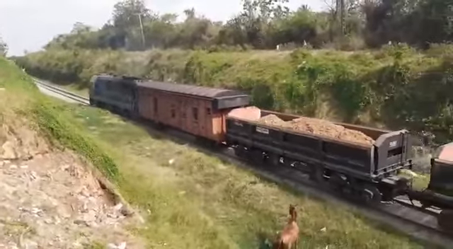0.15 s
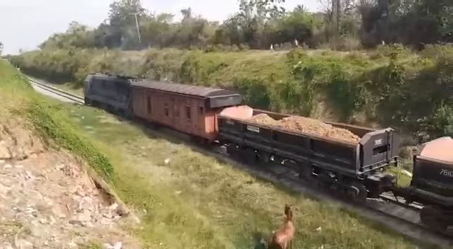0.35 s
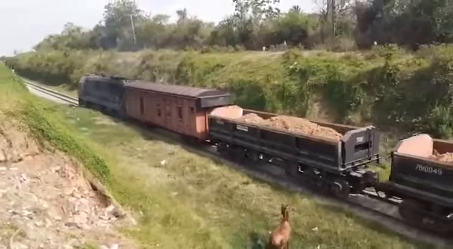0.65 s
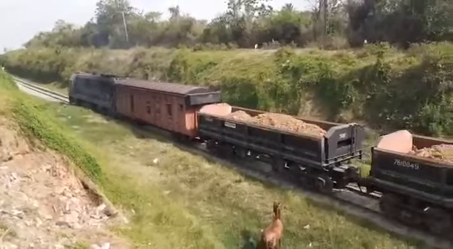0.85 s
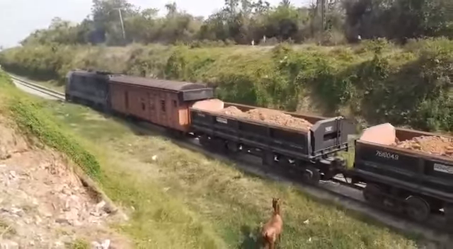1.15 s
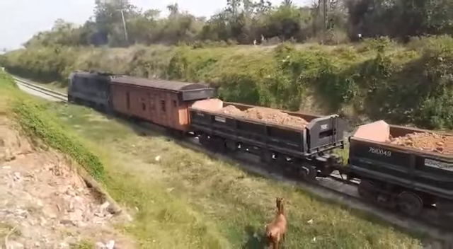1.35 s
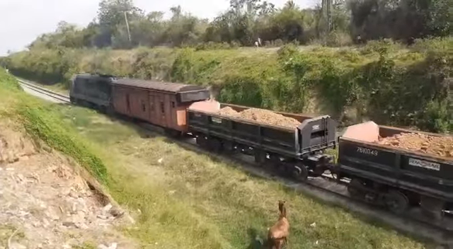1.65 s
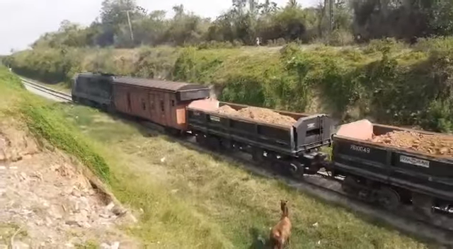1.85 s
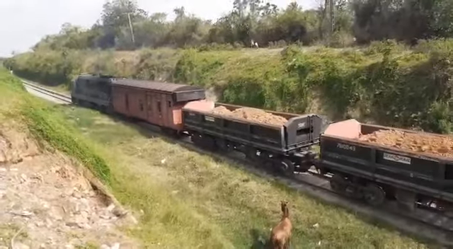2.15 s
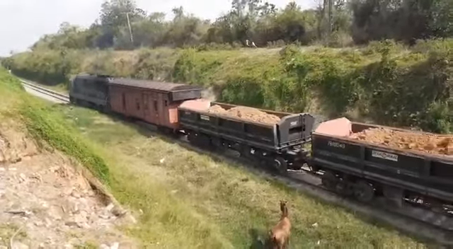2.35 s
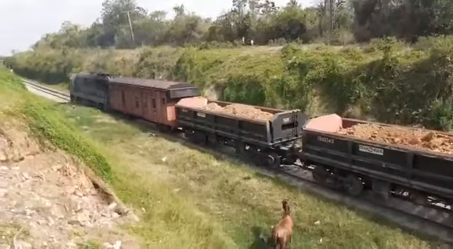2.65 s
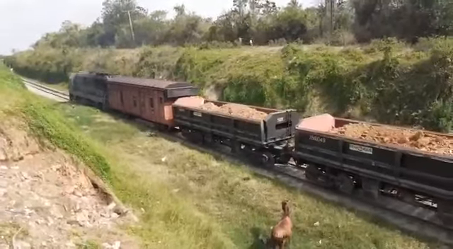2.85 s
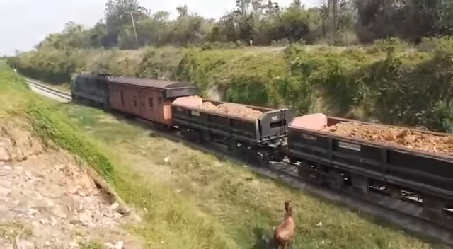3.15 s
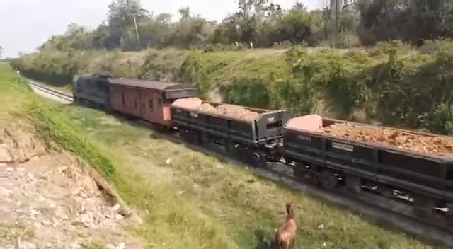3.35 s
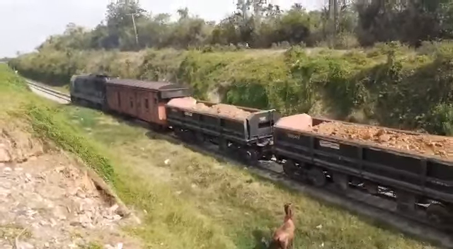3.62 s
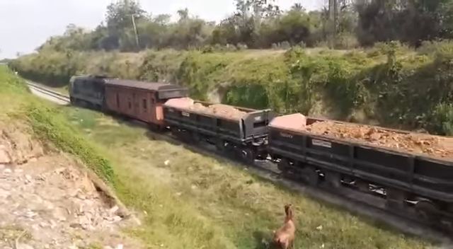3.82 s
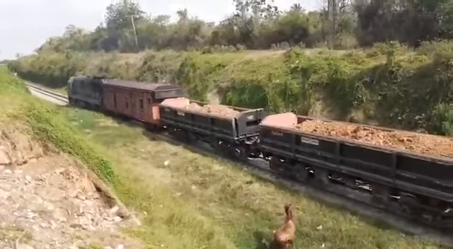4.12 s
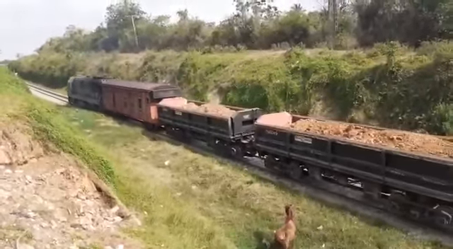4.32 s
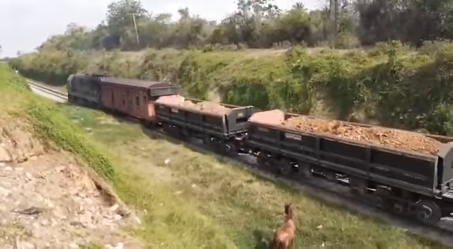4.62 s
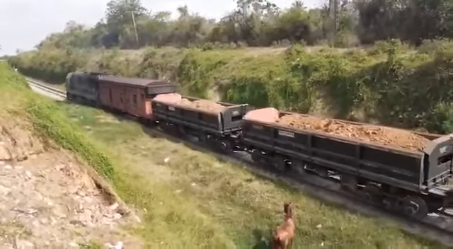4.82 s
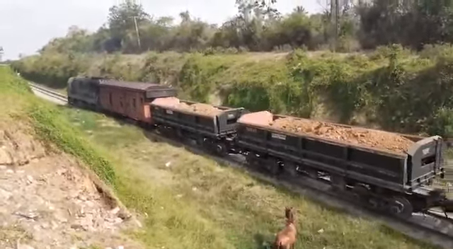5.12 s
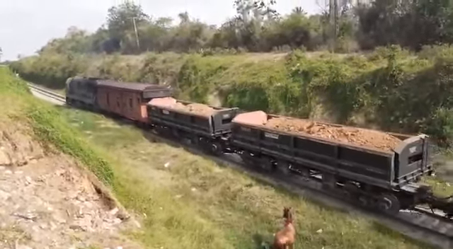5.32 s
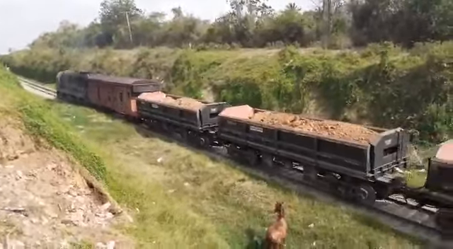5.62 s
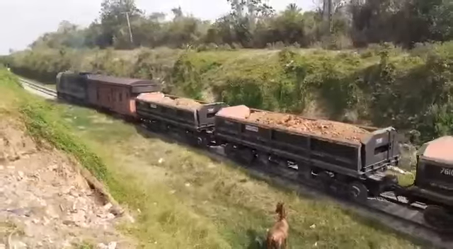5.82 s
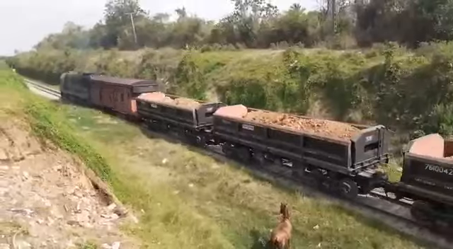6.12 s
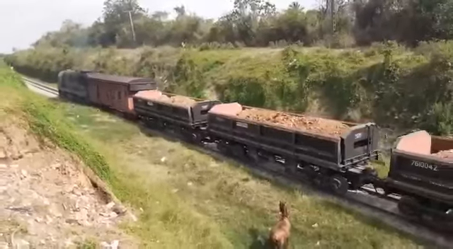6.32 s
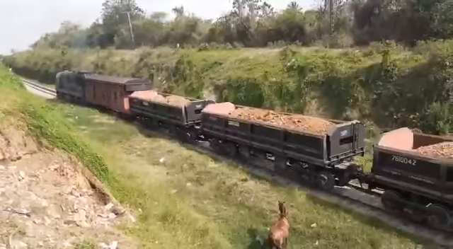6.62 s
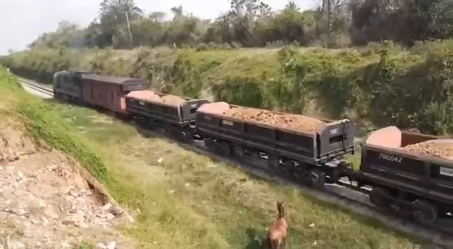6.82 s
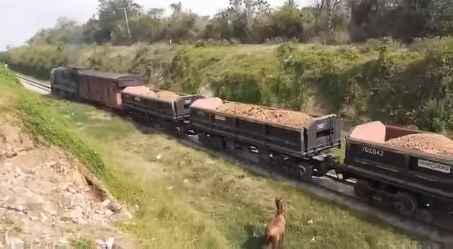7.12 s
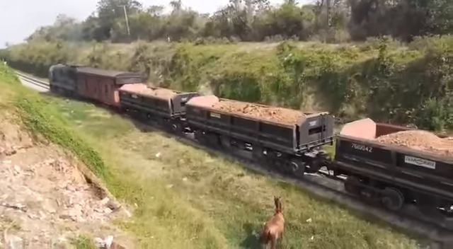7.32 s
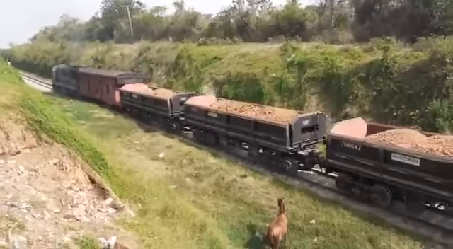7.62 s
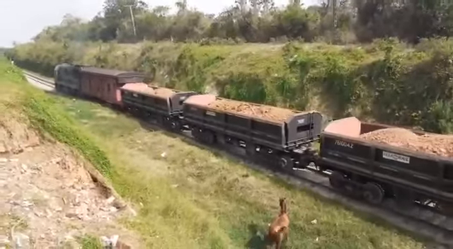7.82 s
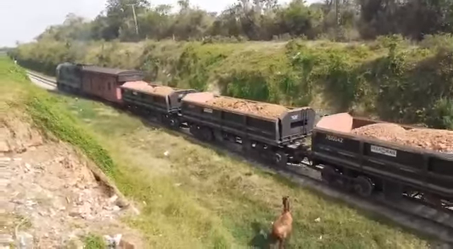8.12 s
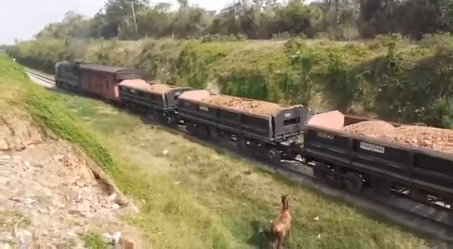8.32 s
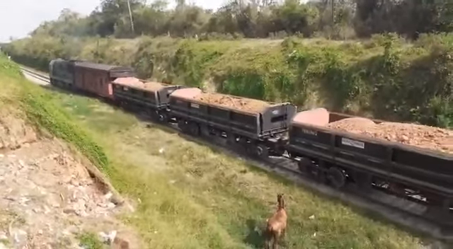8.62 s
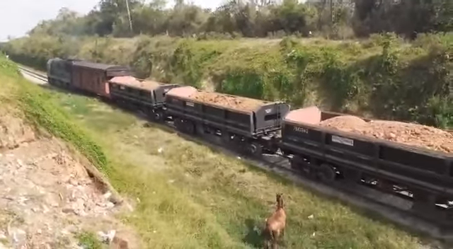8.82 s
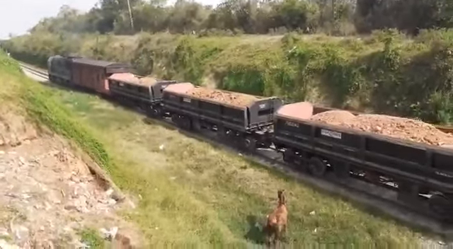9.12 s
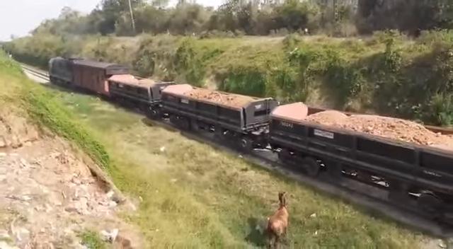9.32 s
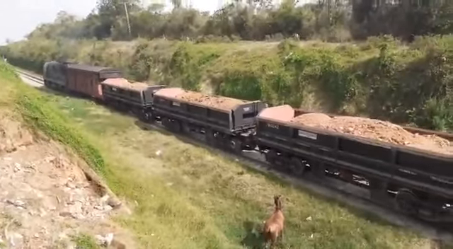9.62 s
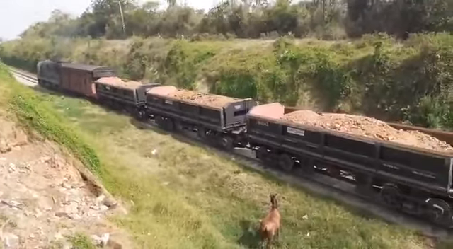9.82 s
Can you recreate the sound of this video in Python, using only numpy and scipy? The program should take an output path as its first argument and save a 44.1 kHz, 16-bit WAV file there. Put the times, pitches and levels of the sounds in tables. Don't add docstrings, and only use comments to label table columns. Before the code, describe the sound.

A diesel locomotive throbs hard with an uneven chugging beat, drawing loaded freight wagons away outdoors while wind thumps and crackles on the microphone.

```python
import sys
import numpy as np
from scipy import signal
from scipy.fft import rfft, irfft
from scipy.io import wavfile
from scipy.ndimage import uniform_filter1d

SR = 44100
rng = np.random.default_rng(int(sys.argv[2]) if len(sys.argv) > 2 else 0)


def transcribe(u):
    v = np.clip(np.atleast_2d(u).T, -1, 1)
    q = np.round(v * 32767).astype(np.int16)
    wavfile.write(sys.argv[1], SR, q)


def volts_from_db(level):
    exponent = np.asarray(level, float) / 20
    return 10 ** exponent


N = 439222
T = np.arange(N) / SR
LEAD_SAMPLES = 8


def evened(x):
    return x / np.sqrt(np.mean(x ** 2, -1, keepdims=True) + 1e-20)


def read(points, hz):
    f, value = np.transpose(points)
    return np.interp(np.log(hz + 1), np.log(f + 1), value)


def curves(rows, t=T):
    s, *columns = np.transpose(rows)
    return [np.interp(t, s, c) for c in columns]


def wander(hz):
    z = rfft(rng.standard_normal(N))
    bin_hz = np.arange(len(z)) * SR / N
    return evened(irfft(z / (1 + (bin_hz / hz) ** 4), N))


def swells(calm_db, middle_s, length_s, level_db):
    power = volts_from_db(calm_db) ** 2 + 0 * T
    for s, span, level in zip(middle_s, length_s, volts_from_db(level_db)):
        at = slice(max(round((s - 4 * span) * SR), 0), round((s + 4 * span) * SR))
        power[at] += level ** 2 * np.exp(-2 * ((T[at] - s) / span) ** 2)
    return np.sqrt(power)


def resonate(x, hz, width_hz):
    turn = np.exp(2j * np.pi * np.cumsum(hz * np.ones(len(x))) / SR)
    r = np.exp(-np.pi * width_hz / SR)
    return 2 * (turn * signal.lfilter([1 - r], [1, -r], x / turn)).real


def band(x, lo_hz, hi_hz, order):
    return signal.sosfilt(signal.butter(order, [lo_hz, hi_hz], "band", fs=SR, output="sos"), x)


# pitch_hz, likeness [0-1]
LIKENESS = [(60, .5), (300, .8), (800, .65), (2000, .4), (3200, .45), (5000, .35), (11000, .35)]


def noise_pair(colour_db, patchy_db, size):
    frames, hz = 4 * N // size + 5, np.fft.rfftfreq(size, 1 / SR)
    a, b, c, d, patches = rng.standard_normal((frames, len(hz), 5)).T
    patches = uniform_filter1d(uniform_filter1d(patches, size=12, axis=0), size=14, axis=1)
    same = np.clip(read(LIKENESS, hz), 0, 1)[:, None]
    late = np.exp(-2j * np.pi * hz * LEAD_SAMPLES / SR)[:, None]
    left = a + 1j * b
    right = same * late * left + np.sqrt(1 - same ** 2) * (c + 1j * d)
    z = np.array([left, right]) * volts_from_db(colour_db(hz)[..., None] + patchy_db * patches / patches.std())
    return evened(signal.istft(z, nperseg=size, noverlap=3 * size // 4)[1][:, :N])


# time_s, rate_hz [cycles/s]
SPEED = [(0, 6.417), (2.5, 6.417), (4, 6.438), (5, 6.455), (7, 6.46), (8, 6.445), (10, 6.441)]


def engine_turns():
    return np.cumsum(curves(SPEED)[0]) / SR


def beats(pattern, hz, width_hz, uneven_db, slip_s):
    t = np.arange(4000) / SR
    place, db = np.transpose(pattern)
    luck = rng.standard_normal((65, len(place), 2))
    at_s = np.interp(np.arange(65)[:, None] + place, engine_turns(), T) + slip_s * luck[..., 0]
    kicks = np.zeros(N + 1)
    np.add.at(kicks, np.clip(at_s * SR, 0, N).astype(int), volts_from_db(db + uneven_db * luck[..., 1]))
    ring = t * np.exp(-np.pi * width_hz * t) * np.sin(2 * np.pi * hz * t)
    return signal.oaconvolve(kicks, ring / abs(ring).max())[:N]


# place [0-1 of engine cycle], level_db
SILENCER_BEATS = [(0.0725, -21.2), (0.3662, -26.8), (0.4088, -27.3), (0.475, -21.1), (0.535, -28.9),
                  (0.635, -25.2), (0.7412, -21.0), (0.7887, -20.9), (0.9588, -30.4)]
# place [0-1 of engine cycle], level_db
STACK_BEATS = [(0.0488, -22.4), (0.0962, -16.2), (0.1588, -20.8), (0.185, -17.0), (0.2112, -22.4),
               (0.3275, -26.8), (0.4262, -20.8), (0.6525, -17.9), (0.7812, -20.5), (0.84, -26.9)]


def exhaust_beats():
    silencer = evened(beats(SILENCER_BEATS, hz=140, width_hz=80, uneven_db=1.5, slip_s=.0002))
    stack = evened(beats(STACK_BEATS, hz=310, width_hz=80, uneven_db=2.5, slip_s=.00018))
    return volts_from_db(-3.0 + 1.0 * wander(1.9)) * stack + volts_from_db(-8.5 + 1.9 * wander(3.5)) * silencer


# pitch_hz, level_db
RUMBLE = [(25, -74), (60, -4.5), (115, -2.5), (200, -4.5), (300, 3), (380, -9), (480, -16), (600, -46)]


def engine_low(exhaust, exhaust_db, boost_db):
    rumble = noise_pair(lambda hz: read(RUMBLE, hz), patchy_db=1.0, size=4096)
    drone = np.sqrt(2) * np.sin(2 * np.pi * 18 * engine_turns())
    low = np.array([exhaust, np.roll(exhaust, LEAD_SAMPLES)]) + volts_from_db(-2.0) * rumble + volts_from_db(-12.0) * drone
    return low * volts_from_db(exhaust_db + np.outer([0, .68], boost_db))


# pitch_hz, level_db
ROAR_LEFT = [(600, -4), (760, 1.5), (1000, -10.5), (1250, -9.5), (2000, -10.5), (2800, -12.5), (3400, -24),
             (4800, -27), (6500, -32), (8600, -26.5), (9300, -30), (9900, -32), (11000, -29), (11700, -63)]
# pitch_hz, level_db
ROAR_RIGHT = [(600, -4), (760, 6), (1000, -2.5), (1250, -4.5), (2000, -3), (2800, -7), (3400, -17),
              (4800, -13.5), (6500, -14), (8600, -15.5), (9300, -21.5), (9900, -54), (11000, -31),
              (11700, -36)]


def roar_and_hiss(throb, exhaust_db, left_db, right_db, boost_db):
    rolling_share, engine_share = 0.61, 0.45
    roar_db = -36 + rolling_share * (left_db - left_db.mean()) + engine_share * (exhaust_db - exhaust_db.mean())

    def colour_db(hz):
        return np.array([read(ROAR_LEFT, hz), read(ROAR_RIGHT, hz)]) - 40 * (hz < 480)

    def split_db(hz):
        return np.clip(np.log(hz / 3300 + 1e-9) * 60, -90, 90)

    roar = noise_pair(lambda hz: colour_db(hz) - np.maximum(split_db(hz), 0), patchy_db=1.5, size=1024)
    roar = roar * volts_from_db(roar_db - 1.32 + np.outer([0, .55], boost_db) + 0.87 * (throb - 0.5) + 0.79 * wander(24))
    hiss = noise_pair(lambda hz: colour_db(hz) + np.minimum(split_db(hz), 0), patchy_db=1.27, size=1024)
    hiss = hiss * volts_from_db(np.array([left_db, right_db]) + 1.33 * (throb - 1) + 0.76 * wander(11.5))
    return roar + hiss


# middle_s, length_s, level_db
WHISTLE_SWELLS = [(0.287, 0.24, -37), (0.584, 0.075, -38), (1.95, 0.055, -47.5), (2.197, .05, -48),
                  (2.623, 0.068, -52), (3.035, 0.16, -45), (3.415, 0.026, -42), (3.68, .15, -50),
                  (4.526, 0.11, -45.5), (5.62, 0.093, -50.5), (6.68, .06, -47), (8.63, 0.02, -44.5),
                  (9.64, .05, -57), (9.96, .1, -58)]


def turbine_whistle(port_db):
    distant_db = -48 - 0.96 * T + 1.0 * (port_db - port_db[0])
    whine = resonate(rng.standard_normal(N), 5735 + 11 * wander(4), 28)
    whine = whine / (uniform_filter1d(abs(whine), size=500) + 1e-9) ** .7
    return evened(whine) * swells(distant_db, *np.transpose(WHISTLE_SWELLS)) * volts_from_db(2 * wander(20))


# middle_s, level_db, length_s, pitch_hz
CHIRPS = [(.9, -49, .04, 4950), (1.09, -42, .04, 4960), (1.16, -39, .02, 4960), (1.27, -48, .04, 4950),
          (1.88, -45, .02, 5000), (2.25, -47, .1, 4900), (3.02, -48, .04, 4950), (3.46, -47, .05, 4950),
          (4.1, -45, .03, 4950), (4.427, -39, .012, 4950), (6.63, -41, .04, 4950), (7.3, -43, .02, 6200),
          (7.74, -45, .05, 4950)]


def wheel_chirps(right_db):
    chirr = evened(resonate(resonate(rng.standard_normal(N), 4900, 110), 4900, 110)) * volts_from_db(right_db - 24.0)
    steel = rng.standard_normal(N)
    for middle_s, level_db, length_s, pitch_hz in CHIRPS:
        at = slice(round((middle_s - .2) * SR), round((middle_s + .2) * SR))
        bell = np.exp(-((T[at] - middle_s) / length_s) ** 2)
        chirr[at] += evened(resonate(steel[at], pitch_hz, 70)) * volts_from_db(level_db - 1.0) * bell
    return chirr


# time_s, level_db
ENGINE = [(0, -21.5), (.45, -19.5), (.75, -24.5), (1, -22), (1.75, -22), (3.25, -22), (3.5, -24),
          (3.75, -22.5), (4.9, -26.5), (5.55, -22), (6.05, -25), (7.2, -24.5), (7.7, -22), (8.1, -25.5),
          (8.6, -29.5), (8.7, -24), (9.3, -30.5), (9.96, -24.5)]
# time_s, level_db
LEFT_NOISE = [(0, -39.5), (.5, -41), (1, -46), (1.5, -44), (2, -44), (2.6, -42), (3, -43), (3.5, -39.5),
              (4.15, -46.5), (4.5, -44), (5.4, -46), (6, -44.5), (6.5, -42.5), (7, -45.5), (7.5, -43),
              (7.75, -41), (8.3, -48), (9.96, -44)]
# time_s, gain_db
RIGHT_PORT = [(0, 9), (4.4, 9.5), (8, 9), (8.25, 6), (8.6, 7.5), (8.68, 2.5), (8.9, -2.5), (9.3, -4),
              (9.96, 3)]


def train():
    (exhaust_db,), (left_db,), (port_db,) = curves(ENGINE), curves(LEFT_NOISE), curves(RIGHT_PORT)
    right_db, boost_db = left_db + port_db, port_db - 2.0
    exhaust = exhaust_beats()
    throb = evened(uniform_filter1d(abs(exhaust), size=600))
    low = engine_low(exhaust, exhaust_db, boost_db)
    noise = roar_and_hiss(throb, exhaust_db, left_db, right_db, boost_db)
    whistles = turbine_whistle(port_db) + wheel_chirps(right_db)
    return low + noise + whistles * volts_from_db(np.array([2.5 - port_db, 6.1 + 0 * T]))


# middle_s, length_s, thud_db, body_minus_thud_db
GUSTS = [(0, .06, -25.5, 6), (0.487, 0.14, -17.5, 7), (0.673, 0.1, -18.5, 9.5), (1.047, 0.09, -32.5, 10.5),
         (1.323, 0.068, -31, 2), (1.65, 0.085, -16, -5), (1.87, 0.075, -21.5, 4), (2.44, .05, -25, 4),
         (2.534, 0.1, -15, -4), (2.86, 0.13, -21.5, -6.5), (3.19, 0.05, -20, -13), (3.768, .1, -19, 1),
         (4.22, 0.14, -11, -6), (4.43, 0.085, -13.5, -12), (4.646, 0.16, -16, -14), (4.842, 0.088, -19, -9),
         (5.387, 0.11, -9, -8.5), (5.61, 0.085, -11, -4), (5.89, 0.1, -14.5, -18), (6.08, 0.1, -18, -6),
         (6.47, 0.11, -26, 0.5), (7.147, 0.071, -16.5, 1.5), (7.345, 0.089, -22.5, 0),
         (7.698, 0.08, -19.5, 2), (7.874, 0.097, -15.5, 4), (8.043, 0.12, -11, 1), (8.218, 0.083, -16, 5.5),
         (8.566, .12, -13.5, -5.5), (9.06, .1, -42.5, 25), (9.676, .05, -36.5, 11)]
# middle_s, length_s, level_db
RASPS = [(0.107, .05, -26), (.56, 0.066, -15.5), (1.984, .06, -30), (3.757, .1, -33), (4.073, .05, -30),
         (4.29, .05, -30), (5.88, .1, -32), (7.672, .09, -23), (8.017, 0.098, -20), (8.239, 0.074, -15),
         (9.128, 0.066, -22.5), (9.68, .05, -41)]
# start_s, body_db, length_s, rasp_minus_body_db
SLAPS_LEFT = [
    (0.886, -24.5, .008, 0),
    (5.807, -11, .014, -8),
    (7.893, -15, 0.013, -22),
    (8.66, -22, 0.015, -22),
    (9.042, -16, .012, -14),
    (9.176, -19, 0.017, -12),
    (9.708, -12, 0.017, -30),
]
# start_s, body_db, length_s, rasp_minus_body_db
SLAPS_RIGHT = [(.524, -22, .0092, -8), (0.597, -8, 0.022, -8.5), (.718, -6, 0.011, -3.5),
               (.85, -21, 0.0044, 0), (.997, -5.5, 0.016, -18), (3.818, -12.5, 0.023, -22),
               (4.287, -10, .014, -23), (5.691, -9, .013, -26), (7.997, -15, 0.022, -4),
               (8.061, -6, 0.0066, -10), (8.127, -9.5, 0.004, -12), (8.247, -14, 0.019, -5),
               (8.259, -8.5, 0.014, -10.5), (8.321, -9, 0.019, -15), (8.547, -9.5, .014, -10),
               (9.086, -21, 0.028, 0.5), (9.13, -22, 0.0066, -1), (9.158, -27, .01, -11),
               (9.282, -18.5, 0.0093, -15), (9.695, -12.5, .013, -17)]


def wind():
    middle_s, length_s, thud_db, body_db = np.transpose(GUSTS)
    lull_db = curves(RIGHT_PORT)[0] - RIGHT_PORT[0][1]
    thud_gain = swells(-32 + 1.3 * lull_db, middle_s, length_s, thud_db)
    body_gain = swells(-28, middle_s, length_s, thud_db + body_db)
    rasp_gain = swells(-42 + 0.51 * lull_db, *np.transpose(RASPS))
    flutter, air = np.tanh(.7 * wander(35)), rng.standard_normal((6, N))
    thud, left_thud = evened(band(air[:2], 76.0, 166, order=2))
    body, slap_body = evened(band(air[2:4], 215, 380.6, order=2))
    crackle = air[4:] * volts_from_db(7 * wander(130))
    rasp, slap_rasp = evened(band(band(crackle, 434, 730, order=1), 290, 1370, order=1))
    lumps = thud * thud_gain * volts_from_db(3.7 * flutter)
    lumps += body * body_gain * volts_from_db(3.0 * flutter)
    lumps += rasp * rasp_gain * volts_from_db(3.1 * flutter - 5.0)
    out = np.array([left_thud * volts_from_db(-37 + 4.9 * wander(6.1)), volts_from_db(-2.3) * lumps])
    t = np.arange(4000) / SR
    slaps = [(0, *row) for row in SLAPS_LEFT] + [(1, *row) for row in SLAPS_RIGHT]
    for port, start_s, level_db, slap_s, edge_db in slaps:
        at = slice(round(start_s * SR), round(start_s * SR) + len(t))
        shape = np.minimum(t / .0015, 1) * np.exp(-(t / slap_s) ** 2)
        low = shape * (slap_body[at] + 0.32 * thud[at])
        edge = shape ** 2 * slap_rasp[at]
        slap = low / abs(low).max() + volts_from_db(edge_db + 1.0) * edge / abs(edge).max()
        out[port, at] += volts_from_db(level_db) * slap * 2
    return out


def wheel_tone(rows, waver, flutter_db):
    pitch_hz, level_db = curves(rows)
    on = (T > rows[0][0]) & (T < rows[-1][0])
    note = np.sqrt(2) * np.sin(2 * np.pi * np.cumsum(pitch_hz * (1 + waver * wander(29))) / SR)
    return volts_from_db(level_db + flutter_db * wander(15)) * on * note * volts_from_db(np.array([[-3], [3]]))


# time_s, pitch_hz, level_db
SQUEAL = [
    (4.96, 1270, -60),
    (5.0, 1290, -51),
    (5.08, 1370, -49),
    (5.14, 1440, -46),
    (5.25, 1485, -45),
    (5.32, 1450, -47),
    (5.38, 1420, -58),
]


def flange_squeal():
    return wheel_tone(SQUEAL, waver=.012, flutter_db=4) * .8


# time_s, pitch_hz, level_db
GROAN = [
    (6.87, 472, -52),
    (6.93, 470, -35),
    (7.05, 468, -32),
    (7.2, 468, -36),
    (7.42, 481, -34),
    (7.5, 484, -46),
]


def flange_groan():
    return wheel_tone(GROAN, waver=.003, flutter_db=1.5)


def scene():
    return train() + wind() + flange_squeal() + flange_groan()


def top_cut(x):
    return signal.sosfilt(signal.butter(12, 11880, fs=SR, output="sos"), x)


def record(dry):
    limited = dry / (1 + abs(dry) ** 6) ** (1 / 6)
    return top_cut(limited)


dry = scene()
out = record(dry)
transcribe(out)
```